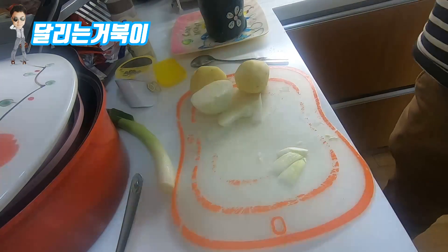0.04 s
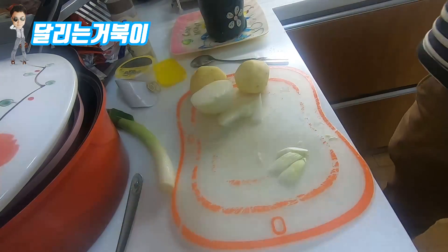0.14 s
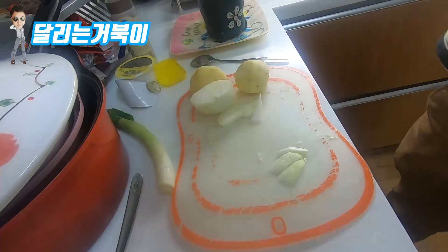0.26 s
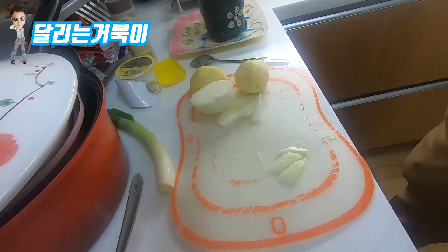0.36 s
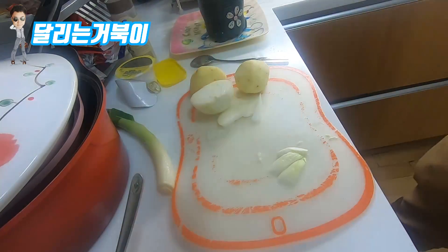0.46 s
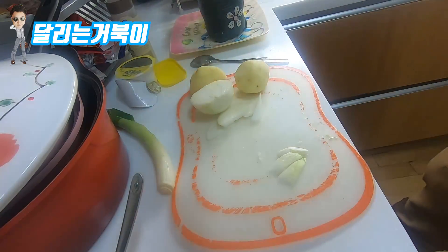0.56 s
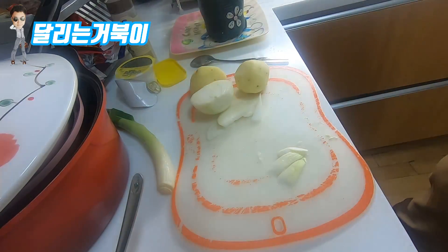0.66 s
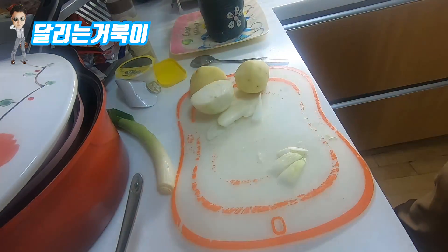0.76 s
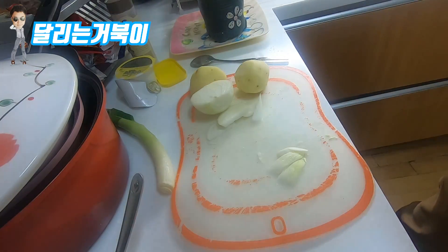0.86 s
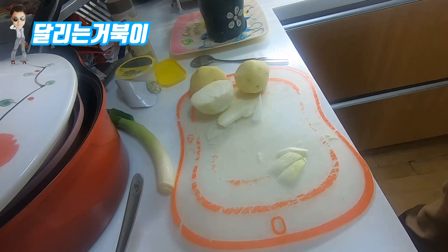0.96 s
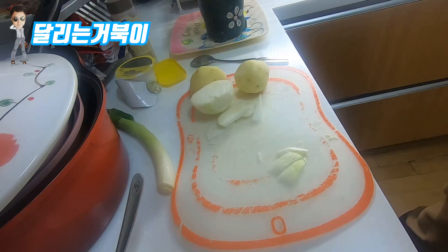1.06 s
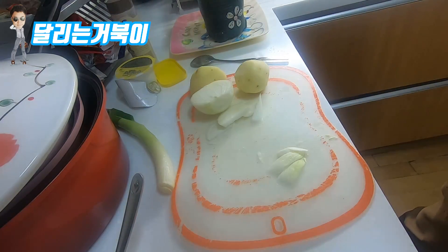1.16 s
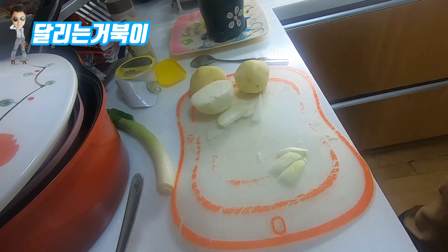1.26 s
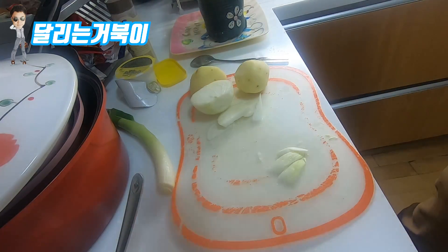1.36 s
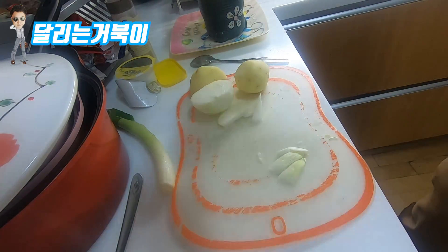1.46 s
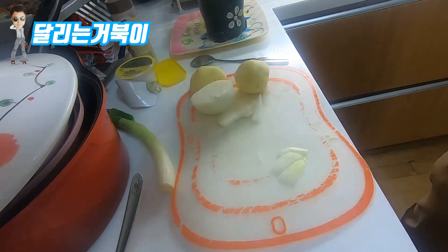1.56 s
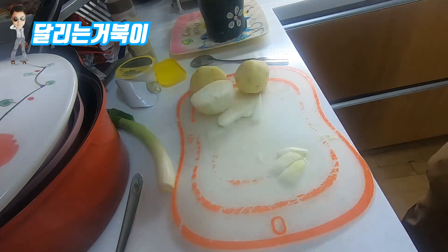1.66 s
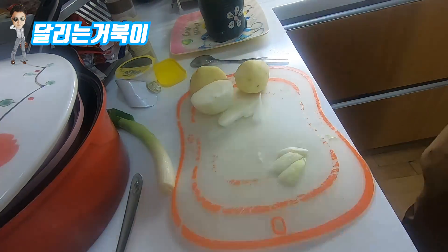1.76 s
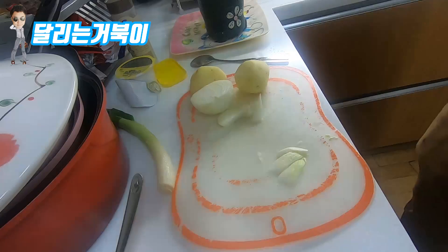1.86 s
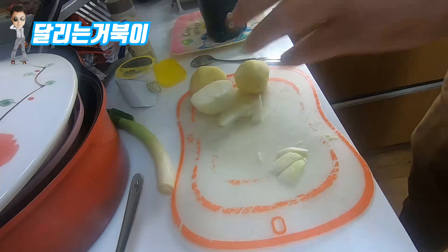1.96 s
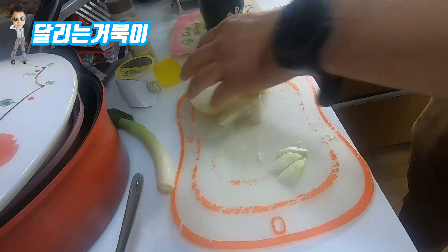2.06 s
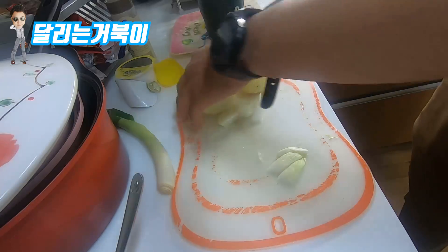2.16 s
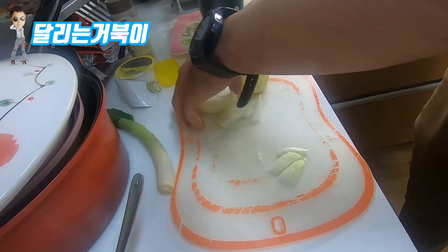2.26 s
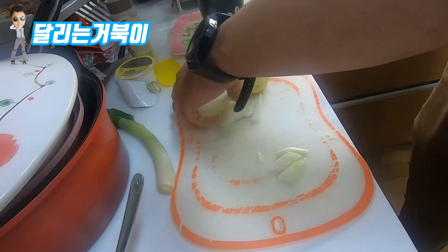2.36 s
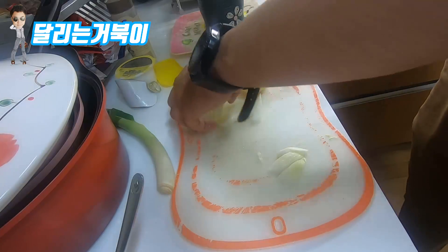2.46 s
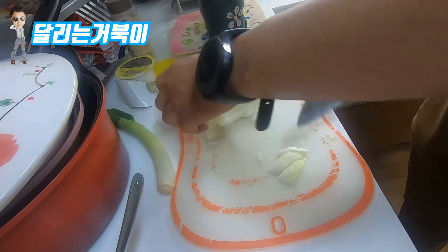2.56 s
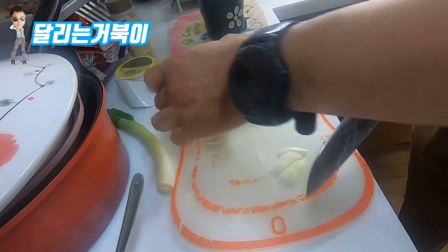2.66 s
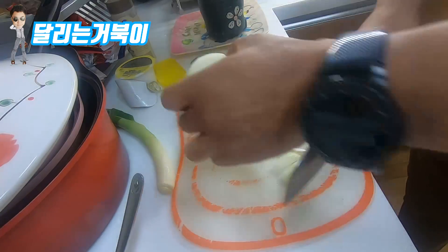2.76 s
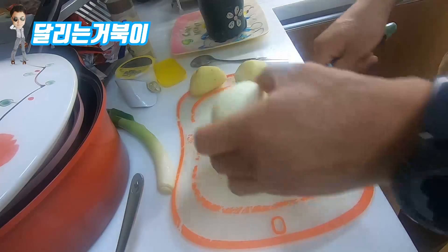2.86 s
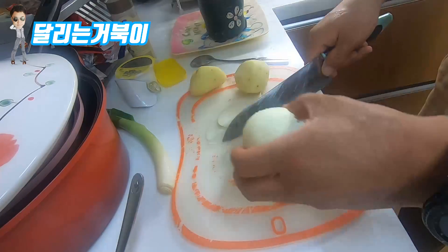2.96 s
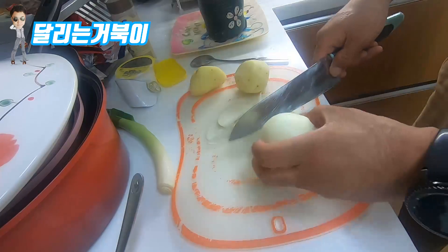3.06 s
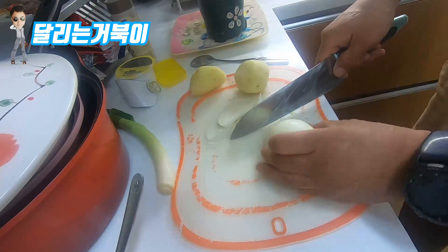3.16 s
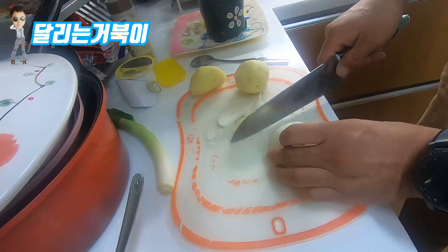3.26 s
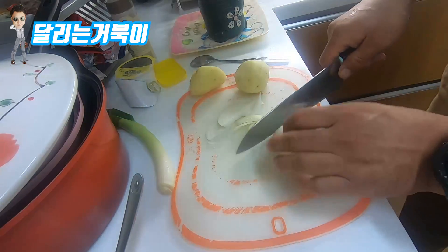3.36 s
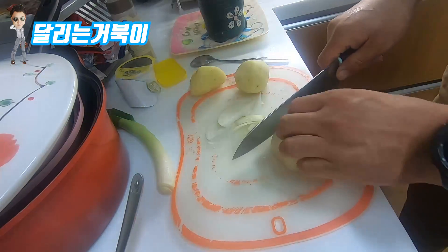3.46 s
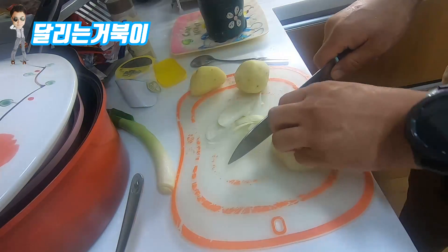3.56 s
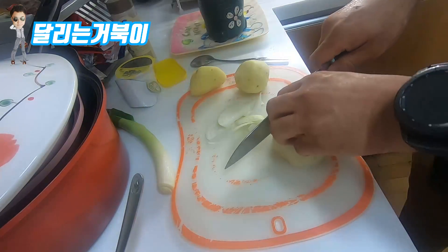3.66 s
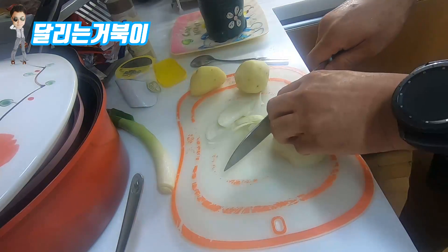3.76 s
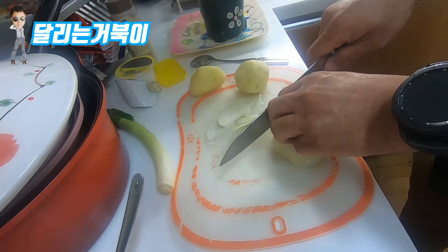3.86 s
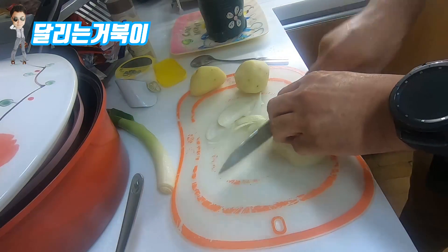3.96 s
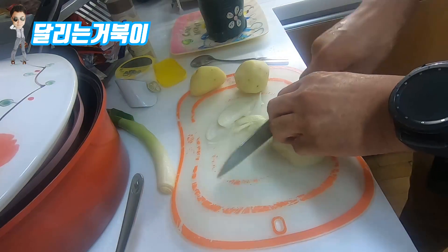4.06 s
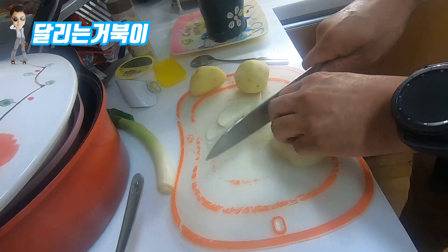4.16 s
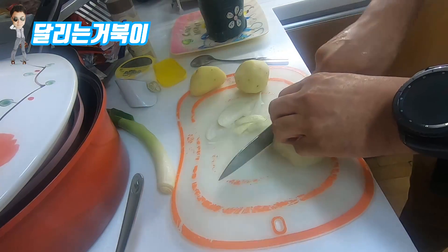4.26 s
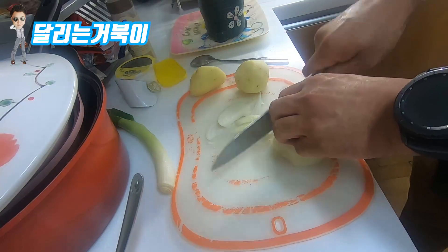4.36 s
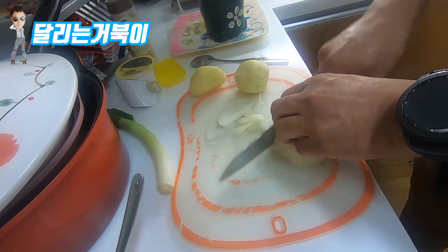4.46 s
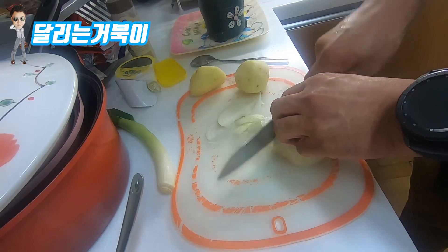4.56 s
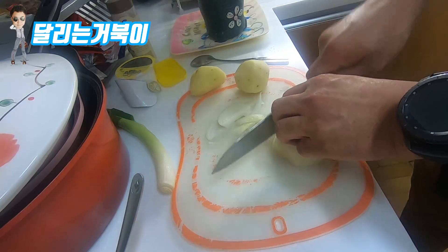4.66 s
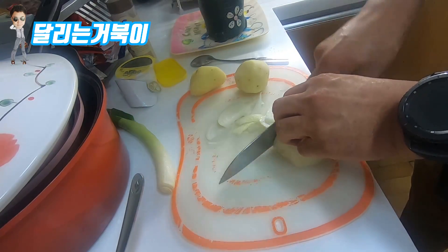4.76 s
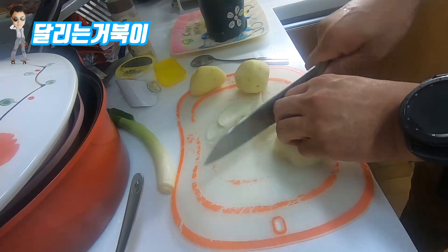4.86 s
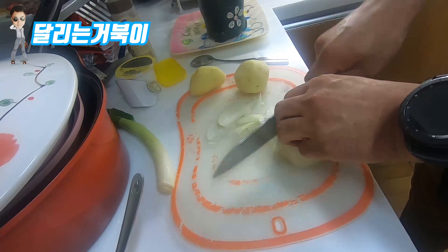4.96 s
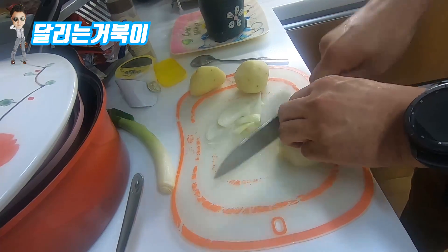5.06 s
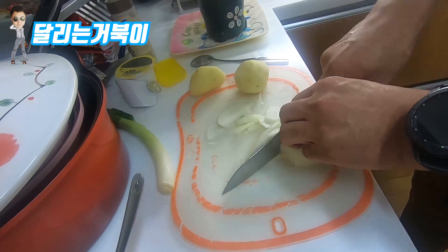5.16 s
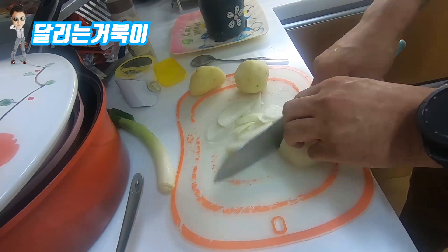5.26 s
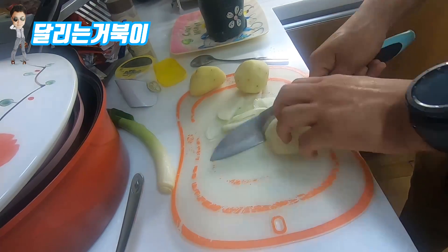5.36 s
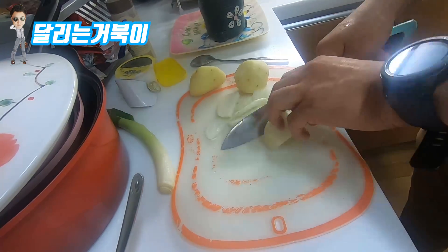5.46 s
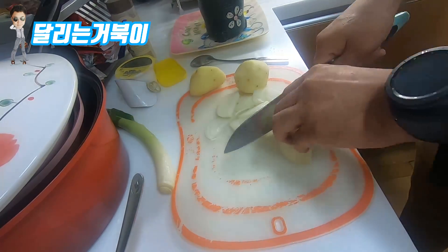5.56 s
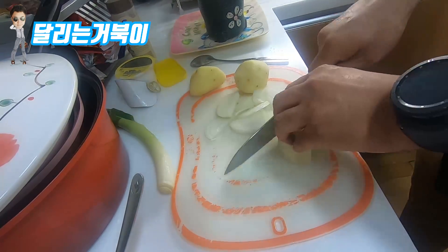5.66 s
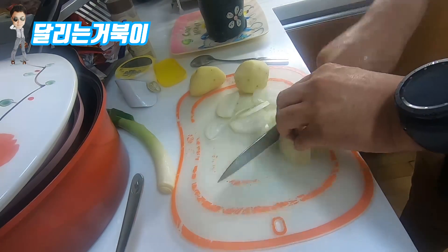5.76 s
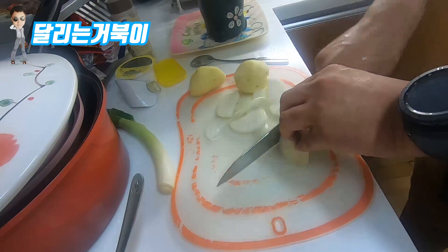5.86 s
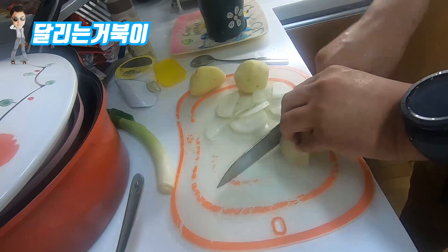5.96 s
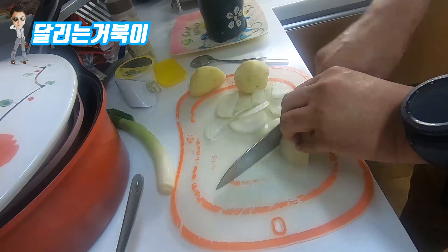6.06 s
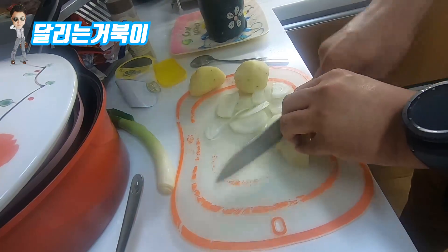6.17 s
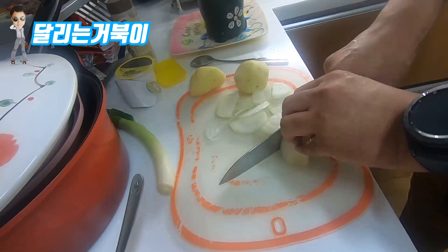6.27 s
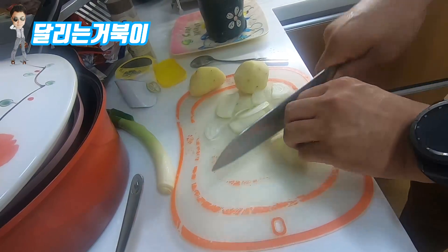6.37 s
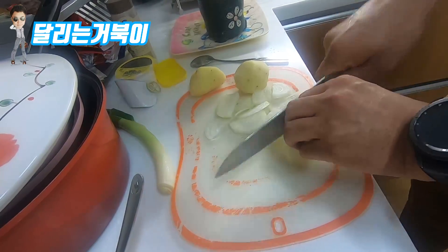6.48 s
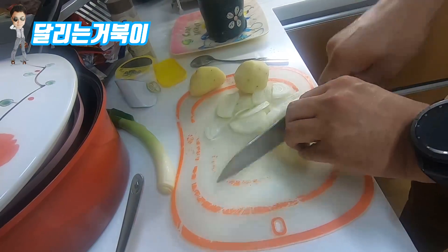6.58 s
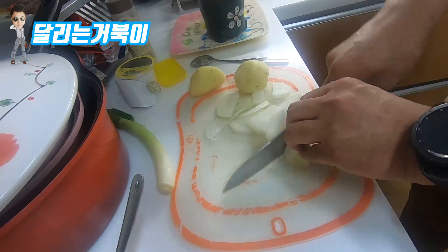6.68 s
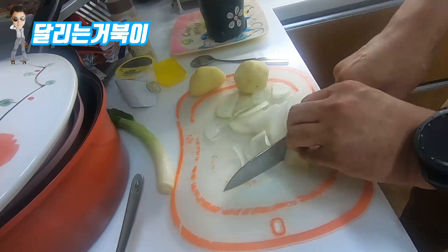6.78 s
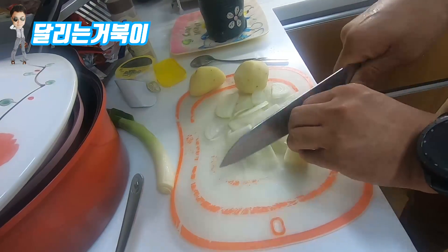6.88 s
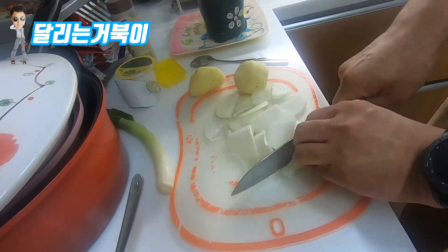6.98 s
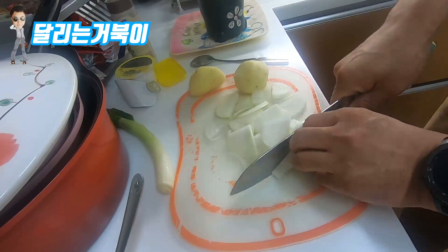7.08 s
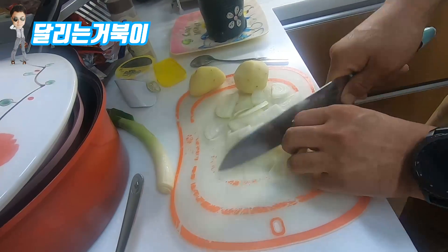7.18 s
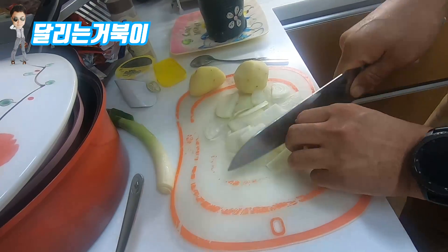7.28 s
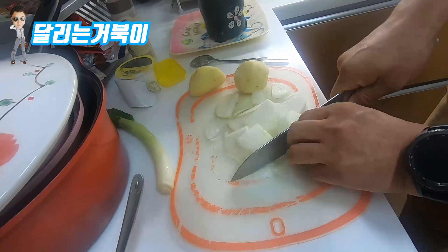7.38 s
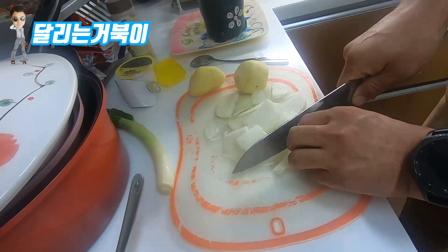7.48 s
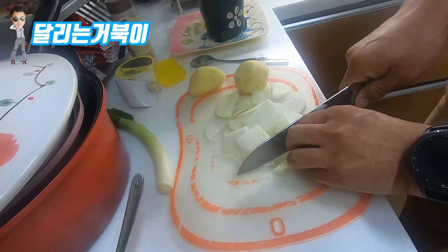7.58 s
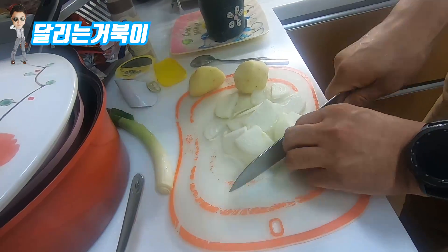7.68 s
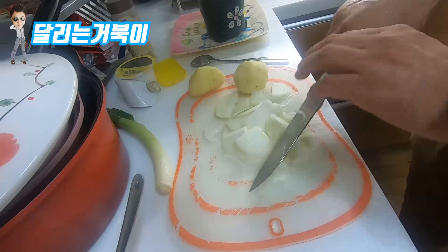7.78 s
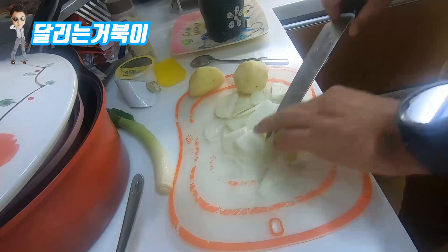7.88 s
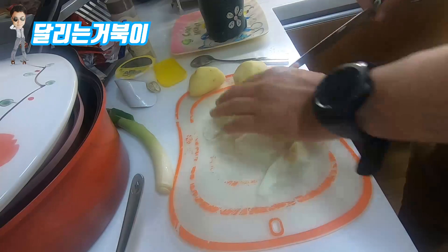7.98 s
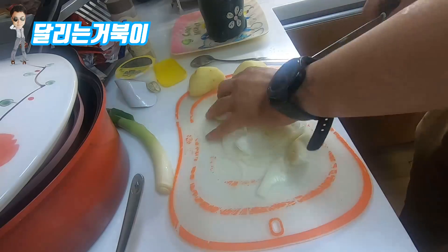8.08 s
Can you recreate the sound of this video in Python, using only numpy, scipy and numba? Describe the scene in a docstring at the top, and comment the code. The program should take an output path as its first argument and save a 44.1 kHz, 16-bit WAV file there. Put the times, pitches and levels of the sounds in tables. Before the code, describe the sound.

In a small hard kitchen with steady hum and hiss, faint rustles give way to a singing blade scrape, loud chops, then fast, higher-pitched chopping.

```python
"""A machine hums and hisses in a small hard kitchen: noise with narrow bands. Floor rumble, rustles and small ticks
come first, then rubs, knife taps and a singing scrape on a plastic board, all shaped noise or damped modes.
Then an onion is chopped: each stroke crunches as gritty noise and knocks as ringing modes of board and blade.
From FAST_FROM_S on the scene runs in fast motion: rings, echo and hum are higher, rings and echo shorter.
The loudest knocks clip and duck the gain."""
import sys
import numpy as np
from scipy import signal
from scipy.fft import rfft, irfft, next_fast_len
from scipy.io import wavfile
from scipy.ndimage import uniform_filter1d
from numba import njit

SR = 44100
rng = np.random.default_rng(int(sys.argv[2]) if len(sys.argv) > 2 else 0)


def bounce(signal):
    """Save signal as a 16-bit WAV file at the path given by the first command-line argument."""
    frames = np.transpose(np.atleast_2d(signal))
    limited = np.clip(frames, -1, 1)
    pcm = np.round(limited * 32767).astype(np.int16)
    wavfile.write(sys.argv[1], SR, pcm)


def invert_db(level):
    """Linear amplitude ratio for a level in decibels (20 dB per decade), elementwise."""
    return 10 ** (np.asarray(level, dtype=float) / 20)


N = 358516
FAST_FROM_S, FAST_FACTOR = 4.975, 2.53


def unit(x):
    """Scales to rms 1."""
    return x / np.sqrt(np.mean(x ** 2) + 1e-20)


def along(points, hz, axis=1):
    """Reads one column of a table on a log frequency axis."""
    rows = np.transpose(points)
    return np.interp(np.log(hz + 1), np.log(rows[0] + 1), rows[axis])


def gains(spans):
    """Gain per sample from (s, dB) curves, silent outside them."""
    t = np.arange(N) / SR
    return sum(invert_db(np.interp(t, *np.transpose(rows), -200, -200)) for rows in spans)


def pace(s):
    """How many times faster than life the scene runs."""
    return np.where(np.asarray(s) < FAST_FROM_S, 1, FAST_FACTOR)


def filtered(x, response):
    """Multiplies the spectrum of x by a response of frequency."""
    m = next_fast_len(x.shape[-1] + 8192)
    return irfft(rfft(x, m) * response(np.fft.rfftfreq(m, 1 / SR)), m)[..., :x.shape[-1]]


def paired(noises, alike):
    """Mixes two unrelated noises to left and right of a given likeness."""
    def mid_side(hz):
        angle = np.arccos(np.clip(alike(hz), -1, 1)) / 2
        return np.array([np.cos(angle), np.sin(angle)])

    mid, side = filtered(noises, mid_side)
    return np.array([mid + side, mid - side])


def gritty(size, spectrum, speed, grit_db):
    """Coloured noise of uneven grains, rms 1, partly unlike at left and right."""
    grain_db = grit_db * rng.exponential(size=size // 24 + 1).clip(0, 2.8)
    grains = rng.standard_normal((2, size)) * invert_db(np.repeat(grain_db, 24)[:size])
    alike = [(500, 0.61), (1500, .6), (3000, 0.8), (12000, 0.3)]  # Hz, likeness
    grains = paired(grains, lambda hz: along(alike, hz))
    return unit(filtered(grains, lambda hz: invert_db(along(spectrum, hz / speed))))


def swell(s, db, rise_s, fall_s):
    """Curve of one stroke: straight up in dB, straight down."""
    edge_db = db - 33.5
    return [(s - rise_s, edge_db), (s, db), (s + fall_s, edge_db)]


# Kitchen echo at life speed. Each row: frequency in Hz, t60 in s, level in dB, left-right likeness.
ROOM = [(25, 0.56, -1, 0.031), (41.2, 0.92, 7, 0), (69, 0.78, 2, 0), (110, 0.31, 2.5, 0.31),
        (200, 0.37, -6.5, 0.94), (620, 0.62, -4.5, 0.64), (1490, .65, -7.5, .2), (2595, 0.48, -8, 0.41),
        (2950, 0.51, -11.5, 0.43), (4190, 0.5, -4.5, 0.85), (4740, .5, -10, .4), (7900, 0.54, -14.5, 0),
        (10800, .2, -12, 0.18), (16000, 0.19, -16.5, .3)]


def add(out, s, dry, room_db, pan_db=0, send=None):
    """Places a sound with a fresh answer of the kitchen; each frequency dies at its own speed."""
    speed = pace(s)
    send = dry[0] if send is None else send
    noise = rng.standard_normal((2, int(SR * .55 / speed)))
    hz, t, z = signal.stft(noise, SR, nperseg=512)
    t60 = along(ROOM, hz / speed)[:, None]
    tail = signal.istft(z * invert_db(-60 * t * speed / t60), SR, nperseg=512)[1]
    tail = filtered(tail, lambda f: invert_db(along(ROOM, f / speed, axis=2)))
    tail = paired(tail, lambda f: along(ROOM, f / speed, axis=3))
    late = np.pad(send, (int(.003 * SR / speed), 0))
    wet = invert_db(room_db) * signal.fftconvolve(late[None], tail / np.linalg.norm(tail[0]), axes=1)
    wet[:, :len(send)] += dry * invert_db([[pan_db / 2], [-pan_db / 2]])
    part = out[:, round(s * SR):][:, :wet.shape[1]]
    part += wet[:, :part.shape[1]]


# Level of the hum, left and right 1.3 dB below and above. Each row: time in s, level in dB.
HUM_LEVEL = [(0, -47), (3.1, -47.5), (3.5, -51), (4.0, -48.5), (4.1, -55.5), (5.0, -57.5), (5.4, -51.5),
             (8.2, -50)]
# Hiss colour at life speed. Each row: frequency in Hz, relative density in dB per Hz.
HISS = [(15, -61), (25, -17.5), (96, -21.5), (178, 0.5), (445, -18.5), (1170, -12.5), (1450, -14.5),
        (2060, -17.5), (2360, -20), (4500, -21.5), (7300, -18), (9300, -7.5), (11200, -23), (14300, -31.5),
        (15500, -44.5)]
# Bands of the hum at life speed. Each row: centre in Hz, width in Hz, level in dB over the hiss.
HUM_BANDS = [(201, 58, -1), (747, 90, 4), (1152, 185, 6.5), (1980, 400, 3.5), (2966, 210, 8.5),
             (4430, 1000, 6.5), (5680, 380, 3), (6574, 550, 2.5), (8260, 140, 2.5), (9000, 47, -6),
             (9260, 210, 5), (9670, 202, 5)]
# Hum in stereo at life speed. Each row: frequency in Hz, left-right likeness.
HUM_ALIKE = [(60, 0.77), (150, 1), (380, 0.044), (950, -0.063), (2380, 0.77), (5980, 0.0067),
             (15000, 0.0014)]


def hum():
    """Steady hiss with narrow bands; fast motion spreads the same power over higher frequencies."""
    def colour(hz):
        bands = sum(invert_db(db) / (1 + (2 * (hz - c) / w) ** 4) for c, w, db in HUM_BANDS)
        return invert_db(along(HISS, hz)) * (1 + bands)

    def at_speed(speed):
        noise = paired(rng.standard_normal((2, N)), lambda hz: along(HUM_ALIKE, hz / speed))
        return filtered(noise, lambda hz: colour(hz / speed) / np.sqrt(speed))

    slow, fast = at_speed(1), at_speed(FAST_FACTOR)
    both = np.where(np.arange(N) < FAST_FROM_S * SR, slow, fast) / np.std(slow)
    return gains([HUM_LEVEL]) * both * invert_db([[-1.3], [1.3]])


# Someone shifts weight on the floor; left and right 2.5 dB below and above.
# Each row: loudest time in s, level in dB, rise in s, fall in s.
THUDS = [(.902, -48.5, .15, .09), (.994, -47.5, .09, 0.16), (1.226, -66.5, 0.14, .13),
         (2.286, -49.5, 0.097, .13)]
# Soft rustles. Each row: loudest time in s, level in dB, rise in s, fall in s.
RUSTLES = [(.45, -55, .2, .5), (0.804, -45.5, .03, 0.31), (1.074, -61, 0.099, 0.055),
           (2.2, -51.5, 0.086, 0.71), (2.41, -44.5, 0.029, 0.19)]


def steps():
    """Floor rumble and a soft rustle: low and middle noise under swelling curves."""
    rumble_colour = [(15, -41), (40, 0), (70, -13.5), (150, -46.0)]  # Hz, dB per Hz
    rustle_colour = [(60, -27), (280, -13.0), (1000, -1.5), (3000, -4.5), (9000, -25)]

    def noise(colour):
        pair = paired(rng.standard_normal((2, N)), lambda hz: 0.46 + 0 * hz)
        return unit(filtered(pair, lambda hz: invert_db(along(colour, hz))))

    rumble = gains([swell(*row) for row in THUDS]) * noise(rumble_colour) * invert_db([[-2.5], [2.5]])
    rustle = gains([swell(*row) for row in RUSTLES]) * noise(rustle_colour)
    return rumble + rustle


# Hands, knife and tableware. Each row: start in s, level in dB, pitch in Hz, t60 in s.
TICKS = [(.388, -42, 1140, 0.024), (.516, -38.5, 840, 0.025), (.81, -39.5, 279, 0.099),
         (.868, -39.5, 3500, 0.023), (1.368, -35, 4160, 0.035), (1.979, -29.5, 2850, 0.016),
         (5.449, -34.5, 6500, 0.019), (5.491, -39.5, 6760, 0.048), (5.538, -35.5, 5680, 0.024),
         (5.558, -47, 9000, .02), (5.582, -42.5, 480, 0.079), (7.147, -46, 560, 0.026),
         (7.219, -35.5, 5830, 0.024), (7.518, -40.5, 7620, 0.023), (7.668, -33, 9000, 0.012),
         (7.978, -41, 8500, 0.0238)]


def ticks():
    """Short decaying noise coloured around one pitch."""
    out, t = np.zeros((2, N)), np.arange(SR // 12) / SR
    for s, db, hz, t60 in TICKS:
        colour = [(hz / 3, -20), (hz, 0), (hz * 1.66, -9), (hz * 7, -40)]
        envelope = invert_db(db - 60 * t / t60) * np.clip(t / 0.0019, 0, 1)
        add(out, s, envelope * gritty(len(t), colour, 1, grit_db=0.5), room_db=-5.0)
    return out


# Short rubs on the board. Each row: loudest time in s, level in dB, rise in s, fall in s.
FLICKS = [(2.405, -21.5, 0.0069, 0.047), (5.352, -23.5, 0.02, .06)]
# The blade scrapes the board clear. Each row: time in s, level in dB.
SWEEP = [(2.81, -37), (2.82, -43), (2.84, -19.5), (2.876, -12), (2.954, -18), (2.96, -15.5), (3.06, -48)]
# Scrape colour at life speed. Each row: frequency in Hz, relative density in dB per Hz.
SCRAPE = [(180, -53), (300, -25), (446, -40), (720, -25), (1090, -22.5), (2520, -2), (2830, 0.5),
          (7500, -11), (9600, -13), (13100, -25), (15500, -42)]
# Slices are pushed aside. Each row: loudest time in s, level in dB, rise in s, fall in s.
SHUFFLES = [(5.583, -36.5, .035, .05), (5.616, -36.5, 0.039, 0.037), (5.686, -34, .045, 0.034),
            (7.452, -32.5, .032, 0.046)]
# Wet slices sliding, colour as heard. Each row: frequency in Hz, relative density in dB per Hz.
SLICES = [(120, -63), (200, -7), (293, -12.5), (842, -9.5), (1170, -23), (2090, -20), (2850, -12),
          (4180, -10.5), (5590, 1.5), (15500, -23)]


def rubs():
    """Gritty friction noise under each stroke."""
    out = np.zeros((2, N))
    scrapes = [SWEEP] + [swell(*row) for row in FLICKS]
    slides = [swell(*row) for row in SHUFFLES]
    for strokes, colour, paced in (scrapes, SCRAPE, True), (slides, SLICES, False):
        for rows in strokes:
            first, last = round(rows[0][0] * SR), round(rows[-1][0] * SR)
            speed = pace(first / SR) if paced else 1
            noise = gritty(last - first, colour, speed, grit_db=2.5)
            add(out, first / SR, gains([rows])[first:last] * noise, room_db=-18.0)
    return out


def ring(t, modes, cycles):
    """Damped modes that build up over a share of a cycle, low ones last; each blow lands a little differently."""
    chance = rng.standard_normal((len(modes), 2)) * [1.5, .015]  # dB, share of pitch
    out = 0
    for (hz, db, t60), (more_db, off) in zip(modes, chance):
        decay = invert_db(db + more_db - 60 * t / t60)
        out = out + decay * np.sin(2 * np.pi * hz * (1 + off) * t) * (1 - np.exp(-t * hz / cycles))
    return out


# Blade or onion meets the board.
# Each row: start in s, blow level in dB, board level in dB re the blow before trim, blade ring in Hz as heard.
KNOCKS = [(2.763, -5, -39.5, 2170), (3.1472, -5, -27.5, 2560), (3.2858, -12, 0.5, 2550),
          (4.0696, 8, -18, 2117), (4.3256, 5.5, -19, 2104), (4.5672, 2, -24, 2084), (4.783, 5.5, -15, 2076),
          (4.9994, 1.5, -19.5, 5290), (5.1047, 2, -19, 5530), (5.2722, 1.5, -22.5, 5220),
          (5.8473, 2, -13.5, 5430), (5.9419, 2.5, -17, 5720), (6.0329, 1, -17, 5910), (6.123, 0, -16, 6180),
          (6.2161, 3, -17, 5920), (6.3117, 0.5, -17, 5500), (6.5135, 1, -16, 6010), (6.617, 1.5, -16, 6300),
          (6.721, 1.5, -16, 6210), (6.85, 2, -14.5, 5920), (7.0307, -0.5, -13.5, 6220),
          (7.451, -19.5, -11.5, 6040), (7.7068, 1.5, -17.5, 6760)]
# The knife works along the board. Each row: time in s, left over right in dB.
PLACE = [(2.7, -2.5), (5.3, -3), (6.1, -0.5), (7.7, 1.9)]
# Blade modes before each blow's changes. Each row: multiple of its ring, level in dB, t60 in s at life speed.
BLADE = [(0.619, -7, 0.0044), (.8, -12.5, 0.014), (1.002, 0, 0.012), (1.109, -6, 0.01),
         (1.329, -10.5, .008), (1.688, -12.5, 0.0089), (1.97, -16.5, 0.006), (2.9, -20, .005),
         (3.4, -21.5, 0.0055)]
# Board and counter at life speed. Each row: frequency in Hz, level in dB, t60 in s.
BOARD = [(114.5, -12.5, 0.17), (176.9, -1, 0.15), (231.8, -10, 0.19), (262.2, -3.5, 0.12),
         (317.5, 9.5, 0.038), (384, -1.5, 0.043), (501, -4.5, 0.05), (640, -5.5, 0.055), (875, -12, 0.039)]
# Boom under the counter at life speed. Each row: frequency in Hz, level in dB, t60 in s.
CABINET = [(38.3, -8.5, 0.17)]
# Crack of a blow. Each row: frequency in Hz, relative density in dB per Hz.
CRACK = [(25, -12), (45, -4), (150, 0), (700, 3.5), (1500, 7.5), (2200, 14), (4200, -4), (7000, -11),
         (11000, -27.5), (16000, -37.5)]
CRACK_HZ, CRACK_RISE_S = 2240, 0.00025  # blade ring at which CRACK holds as noise, it moves with the ring; rise
KNOCK_ROOM_DB, ROOM_LAGS = -8, 0.52  # room under a 0 dB blow; dB it falls behind per dB of harder blow


def knocks():
    """Each blow rings board and blade and cracks for a moment."""
    out = np.zeros((2, N))
    for s, db, board_db, blade_hz in KNOCKS:
        speed = pace(s)
        room_db = KNOCK_ROOM_DB - ROOM_LAGS * max(db, 0)
        pan_db = np.interp(s, *np.transpose(PLACE))
        t = np.arange(int(SR * .25 / speed)) / SR * speed  # life time
        tap_db = .5 * min(board_db + 20, 0)  # a tap that hardly moves the board rings longer, on one note
        soft_db = -.7 * max(board_db + 1, 0)  # a soft heavy thing moves the board and little else
        modes = []
        for multiple, level_db, t60 in BLADE:
            lead = abs(multiple - 1) < .06
            mode_db = level_db + tap_db * (-.3 if lead else .75)
            modes.append((multiple * blade_hz / speed, mode_db, t60 * (1.5 - 0.25 * tap_db * lead)))
        blade = invert_db(soft_db) * ring(t, modes, cycles=0.96)
        burst = gritty(len(t), [(120, -27.5)] + CRACK[3:], blade_hz / CRACK_HZ, grit_db=-2.5)
        crack = invert_db(0.35 * tap_db - 3.5 - 60 * t / 0.011) * (1 - np.exp(-t / CRACK_RISE_S)) * burst
        board = -invert_db(board_db + 4.5) * ring(t, BOARD, cycles=0.88)
        # the room answers a smooth broadband click along with softer blade and board rings
        click = filtered(1. * (np.arange(len(t)) == 80), lambda hz: invert_db(along(CRACK, hz / speed)))
        send = invert_db(tap_db + 18.0) * click / np.linalg.norm(click) / np.sqrt(speed)
        send = send + invert_db(-10.5) * blade + invert_db(-6) * board
        send = send + invert_db(board_db) * ring(t, CABINET, cycles=0.5)
        add(out, s, invert_db(db) * (blade + crack + board), room_db, pan_db, invert_db(db) * send)
    return out


# The edge sings while it scrapes. Each row: time in s, centre in Hz, level in dB before a 3.5 dB cut.
RASP = [(2.82, 2950, -31.5), (2.839, 3027, -14), (2.928, 3010, -30), (2.952, 2710, -35.5),
        (2.964, 2625, -20), (3.032, 2830, -38)]


def rasp():
    """A narrow band of noise around a gliding pitch: slow noise on two carriers a quarter turn apart."""
    out, (s, hz, db) = np.zeros((2, N)), np.transpose(RASP)
    t = np.arange(s[0], s[-1], 1 / SR)
    flutter = unit(filtered(rng.standard_normal((2, len(t))), lambda f: 1 / (1 + (f / 160) ** 2)))
    phase = 2 * np.pi * np.cumsum(np.interp(t, s, hz)) / SR
    band = flutter[0] * np.cos(phase) + flutter[1] * np.sin(phase)
    band = invert_db(np.interp(t, s, db) - 3.5) * band
    add(out, s[0], np.array([band, band]), room_db=-21.0)
    return out


# The edge enters the onion. Each row: start in s, entry crunch in dB before the snap, thump gain in dB re crunch.
CUTS = [(3.142, -52, -11), (4.0347, -25.5, -2), (4.293, -30, 10), (4.5288, -30, 8.5), (4.7530, -37, 10),
        (4.9819, -32.5, 9), (5.0850, -32.5, 5), (5.185, -29.5, 5.5), (5.265, -29, 2), (5.8405, -27, 3.5),
        (5.9276, -31.5, 1.5), (6.0190, -28, 2), (6.1106, -30, 0), (6.2023, -27.5, -2.5), (6.296, -26, 0.5),
        (6.499, -20, -8), (6.6012, -23.5, -1.5), (6.6987, -30.5, 2), (6.825, -35.5, 6.5), (7.007, -37.5, 8),
        (7.6792, -34, -0.5)]
# Tearing flesh at life speed. Each row: frequency in Hz, relative density in dB per Hz.
CRUNCH = [(290, -7.5), (500, 2.5), (1170, -7.5), (3770, -5.5), (7680, -19), (9790, -15.5), (13400, -28),
          (15000, -49)]
DEEP_DB, SETTLES = -26.5, 0.98  # level deep in the flesh, share of the way there by the end
STALL_DB = -6.5  # fade of a cut that never lands
BITE_DB, BITE_S, FIRM_DB = 3, 0.012, -34  # the skin snaps: most extra level, decay; gentler entries make no snap
LAYER_S, LAYER_DB = 0.00394, 3  # the flesh gives way in fits: length of a fit at life speed, spread


def cuts():
    """The edge thumps into the onion and tears cells, until it reaches the board or stalls."""
    out, stops = np.zeros((2, N)), np.transpose(KNOCKS)[0]
    for s, db, thump_db in CUTS:
        speed = pace(s)
        stop = stops[stops > s][0]
        last = min(stop - s, 0.084 / speed)
        lands = s + last >= stop - 1 / SR
        t = np.arange(int(SR * last)) / SR * speed  # life time
        swell_db = SETTLES * (DEEP_DB - db) if lands else STALL_DB
        snap_db = np.clip(db - FIRM_DB, 0, BITE_DB) * lands * np.exp(-t / BITE_S)
        fits = rng.standard_normal(40)
        fit_db = LAYER_DB * np.interp(t / LAYER_S, np.arange(len(fits)), fits)
        crunch = gritty(len(t), CRUNCH, speed, grit_db=2) * invert_db(fit_db)
        # one thump, then the tearing keeps shaking the board
        push = invert_db(-32.5) * rng.standard_normal(len(t)) + (t == 0)
        shake = signal.fftconvolve(push, ring(t, BOARD[4:], cycles=0.55))[:len(t)]
        both = invert_db(db + swell_db * t / t[-1] + snap_db) * crunch + invert_db(db + thump_db) * shake
        add(out, s, both * np.clip(t / 0.0015, 0, 1), room_db=-7.0)
    return out


def scene():
    """All sources together."""
    return hum() + steps() + ticks() + rubs() + knocks() + rasp() + cuts()


@njit
def follow(level_db, rise, fall_db):
    """Climbs quickly toward louder sound, sinks no faster than a given rate."""
    held = level_db.copy()
    for i in range(1, len(held)):
        up = held[i - 1] + rise * (level_db[i] - held[i - 1])
        held[i] = max(up, held[i - 1] - fall_db[i])
    return held


def top_cut(x):
    """Nothing passes above the cut-off."""
    return signal.sosfilt(signal.butter(12, 16330, fs=SR, output="sos"), x)


def record(dry):
    """Gain control ducks just after each blow, too late to keep it from clipping, then recovers."""
    power = np.abs(uniform_filter1d(np.mean(dry ** 2, 0), size=88))
    level_db = np.maximum(10 * np.log10(power + 1e-12), -30)
    fall_db = 55 * pace(np.arange(N) / SR) / SR  # 55 dB/s at life speed
    held_db = follow(np.roll(level_db, 66), 0.0083, fall_db)  # 66 samples late
    ducked = dry * invert_db(-.3 * np.clip(held_db + 19.5, 0, None))
    top_hz = 15900
    mix = filtered(np.clip(ducked, -1, 1), lambda hz: 1 / (1 + (hz / top_hz) ** 40))
    return top_cut(mix)


dry = scene()
out = record(dry)
bounce(out)
```